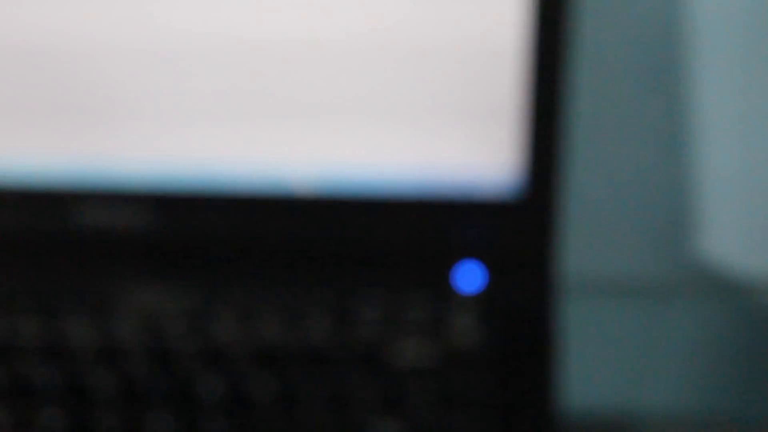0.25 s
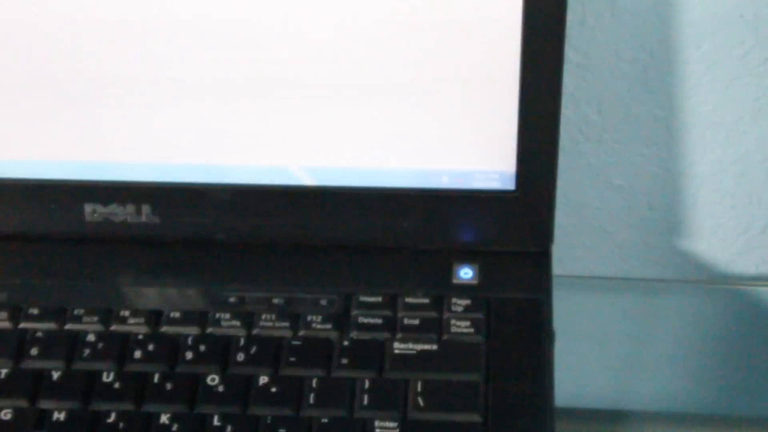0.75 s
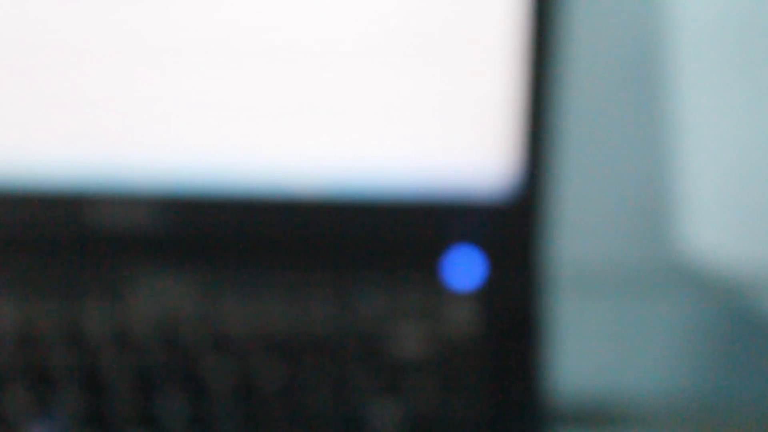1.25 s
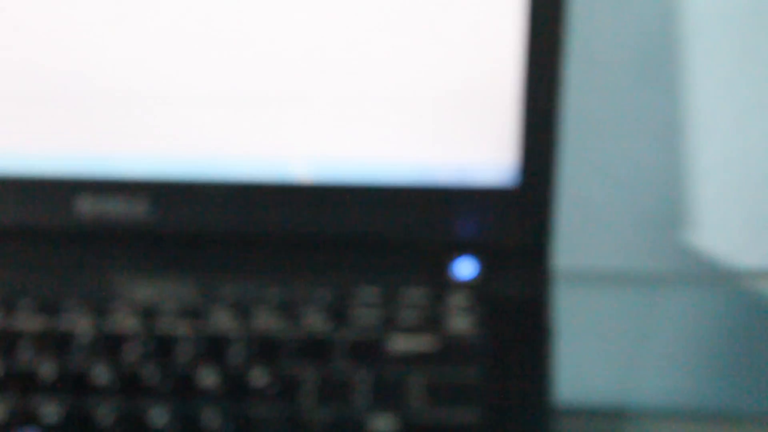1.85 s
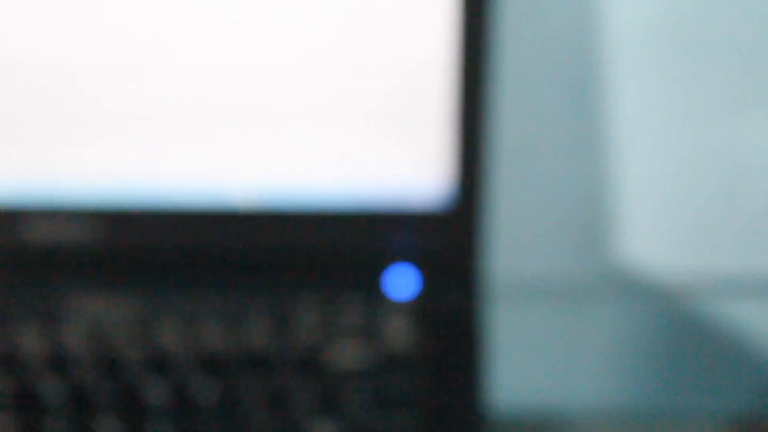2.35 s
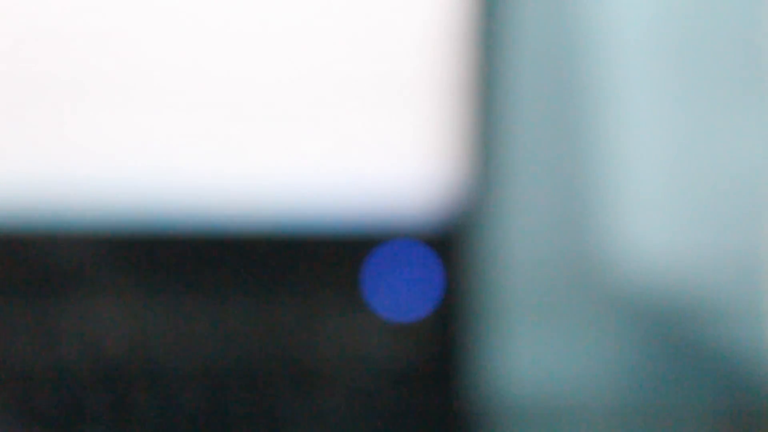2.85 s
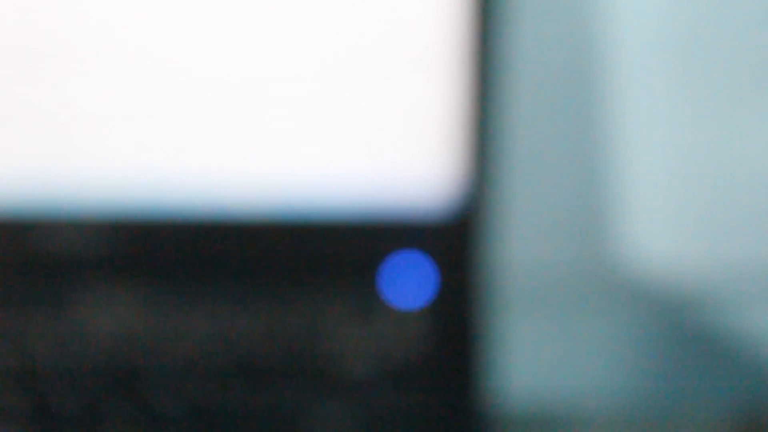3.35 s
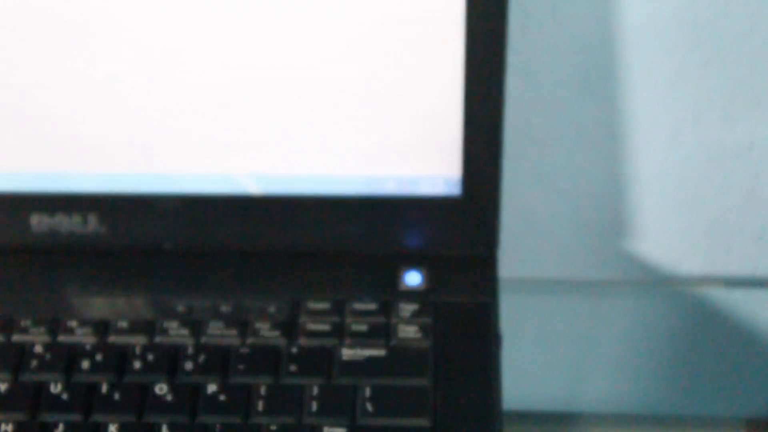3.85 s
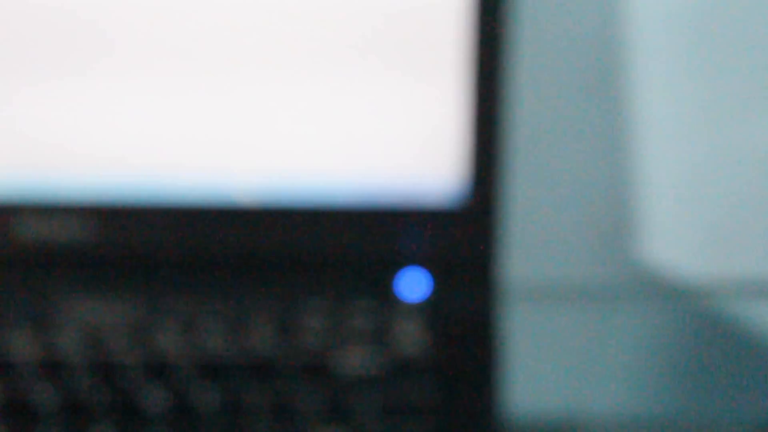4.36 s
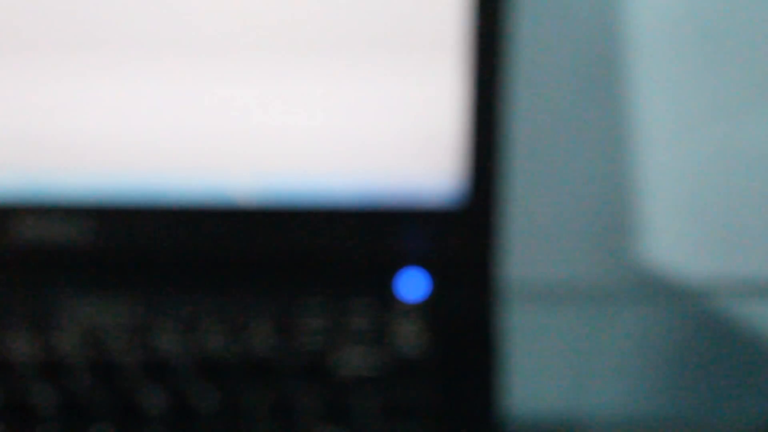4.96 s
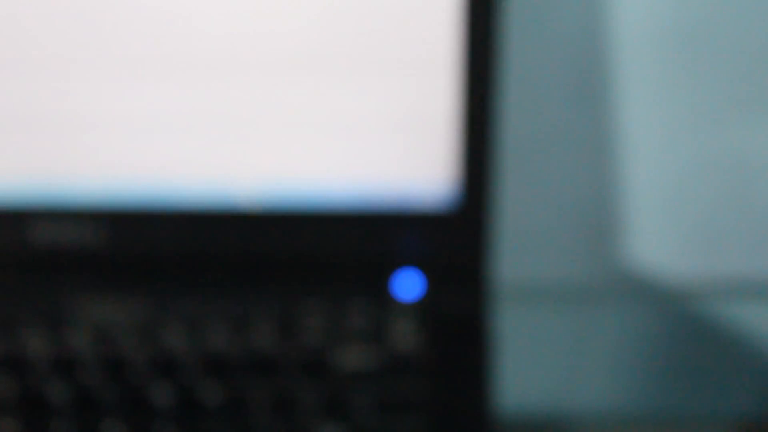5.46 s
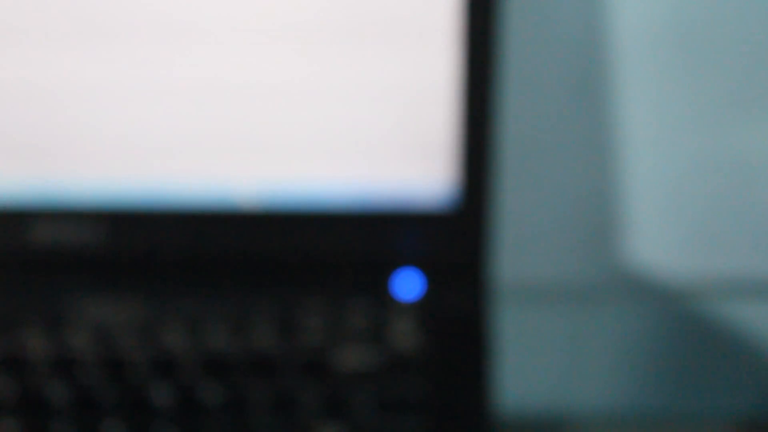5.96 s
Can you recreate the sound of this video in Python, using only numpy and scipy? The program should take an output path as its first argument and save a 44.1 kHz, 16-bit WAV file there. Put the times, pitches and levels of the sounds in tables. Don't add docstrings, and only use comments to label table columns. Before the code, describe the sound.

A low, steady ventilation hum fills a small room throughout, breathing slightly in level. At 0 s a faint hand rustle dies away, with four tiny plastic creaks between 0.25 and 0.6 s. At 0.73 s a little geared lens motor, very close, spins up into a bright whining, gritty whir lasting about 0.4 s. At 1.2 s it runs back, slightly lower and a bit louder, until 1.65 s. From 1.84 to about 3.0 s come nine evenly spaced short buzzes, roughly seven or eight per second, each rising fast and sagging as it coasts; one faint creak at 2.75 s. After a short gap, nine lower, firmer buzzes run from 3.24 to 4.4 s. Quiet hum follows, with a small creak at 4.7 s. A short whir sounds at 5.15 to 5.39 s, then hum and dull faint creaks at 5.65 and 6.17 s. The motor is dry, with only a trace of room echo.

```python
import sys
import numpy as np
from scipy import signal
from scipy.fft import rfft, irfft
from scipy.io import wavfile
from scipy.ndimage import uniform_filter1d

SR = 44100
rng = np.random.default_rng(int(sys.argv[2]) if len(sys.argv) > 2 else 0)


def bounce(signal):
    frames = np.transpose(np.atleast_2d(signal))
    limited = np.clip(frames, -1, 1)
    pcm = np.round(limited * 32767).astype(np.int16)
    wavfile.write(sys.argv[1], SR, pcm)


def volts(x):
    e = np.asarray(x, float) / 20
    return 10 ** e


N = 273420
T = np.arange(N) / SR


def unit(x):
    return x / np.sqrt(np.mean(x ** 2))


def walk(rate):
    hold = int(SR / rate)
    steps = np.repeat(rng.standard_normal(N // hold + 1), hold)
    smooth = uniform_filter1d(uniform_filter1d(steps, hold), hold)
    return unit(smooth[:N])


def response(hz, broad, modes, broad_db, notches=()):
    points = np.array(broad)
    broad_gain_db = np.interp(np.log(hz + 1), np.log(points[:, 0]), points[:, 1])
    power = volts(2 * (broad_db + broad_gain_db))
    for centre, width, db in modes:
        power = power + volts(2 * db) / (1 + (2 * (hz - centre) / width) ** 2) ** 1.655
    dips_db = sum(db / (1 + (2 * (hz - centre) / width) ** 2) for centre, width, db in notches)
    return np.sqrt(power) * volts(dips_db)


def colour(x, *shape):
    size = 16384
    gain = response(np.fft.rfftfreq(size, 1 / SR), *shape)
    cepstrum = irfft(np.log(gain))
    cepstrum[1:size // 2] *= 2
    taps = irfft(np.exp(rfft(cepstrum[:size // 2], size)))[:size // 2]
    return signal.fftconvolve(x, taps)[:N]


# frequency in Hz, level in dB per Hz.
HUM_COLOUR = [(260, -47), (450, -4.5), (546, 0), (705, -4.5), (806, 2.5), (882, -0.5), (979, 0.5),
              (1220, -5), (1650, -6), (2510, -19.5), (9070, -28.5), (15100, -33), (16000, -44)]
# frequency in Hz, width in Hz, level in dB.
ROOM_MODES = [(57, 14, 6.5), (75, 24, 4.9), (128.8, 18.4, 11.7), (145, 13, 11.1), (170.8, 17, 14),
              (218.6, 20.7, 12.8), (259.6, 29, 15.2), (301.8, 19.5, 15.1), (355.3, 41.6, 14.8),
              (397, 11, 12.2), (9000, 40, -21)]


def ventilation():
    air = unit(colour(rng.standard_normal(N), HUM_COLOUR, ROOM_MODES, 0.1))
    level_db = -38 + walk(1.766) / 2
    return air * volts(level_db)


# start in seconds, level in dB, settling time in seconds.
HAND_MOVES = [
    (0, -48, .11),
    (.3, -62, .25),
]


def hand_rustle():
    band = signal.butter(2, [1200, 2500], "band", fs=SR, output="sos")
    rub = unit(signal.sosfilt(band, rng.standard_normal(N)))
    moving = np.full(N, volts(-66))
    for start, db, settle in HAND_MOVES:
        moving += volts(db) * (T >= start) * np.exp(-abs(T - start) / settle)
    return rub * moving * volts(2.0 * walk(12))


# start in seconds, level in dB, first ring in Hz, second ring in Hz, level
# of the second ring against the first in dB.
CREAKS = [
    (0.26, -50, 3000, 1550, 14),
    (.3188, -47, 6300, 11000, 0),
    (.451, -48, 3200, 4300, -3),
    (.5767, -49.5, 6300, 11000, 3),
    (2.752, -47, 4000, 7900, -1),
    (4.683, -49, 4000, 7900, -1),
    (5.65, -49, 4200, 3000, -6),
    (6.172, -50, 4200, 3000, -1),
]


def body_creaks():
    t = np.arange(900) / SR
    out = np.zeros(N + len(t))
    for start, db, low_hz, high_hz, high_db in CREAKS:
        rings = np.sin(2 * np.pi * low_hz * t) + volts(high_db) * np.sin(2 * np.pi * high_hz * t)
        tick = 0.8 * rng.standard_normal(len(t)) * np.exp(-t / 0.0012)
        out[int(start * SR):][:len(t)] += volts(db) * (rings * np.exp(-t / 0.003) + tick)
    return out[:N]


def train(second, head_start, db, first_jolt_db, jolt_db):
    nudges, every_s = 9, 0.1335
    beats = second + every_s * np.arange(-1, nudges - 1)
    first = (beats[0] - head_start, 0.045, 0.07, db - 1.1, first_jolt_db)
    middle = [(start, 0.0365, 0.07, db, jolt_db) for start in beats[1:-1]]
    last = (beats[-1], 0.024, 0.06, db + 0.6, jolt_db + 1.5)
    return [first] + middle + [last]


def motion(moves, spin_up_s, nudge_db):
    brake_s, coast_s = 0.004, 0.03
    speed, loud, load, contact, jolt = np.zeros((5, N))
    for start, on, coast, db, jolt_db in moves:
        span = slice(int(start * SR), int((start + on + coast) * SR))
        t = T[span] - T[span][0]
        off = np.maximum(t - on, 0)
        spin_up = 1 - np.exp(-np.minimum(t, on) / spin_up_s)
        speed[span] = spin_up * np.clip(1 - off / coast, 0, 1) ** 0.9
        load[span] = 0.25 + 0.74 * np.exp(-off / 0.024)
        if on > 0.1:
            contact[span] = np.exp(-off / brake_s)
        else:
            contact[span] = volts(nudge_db) * np.exp(-off / coast_s)
        loud[span] = volts(db)
        jolt[span] = volts(jolt_db) * np.exp(-t / 0.023)
    return speed, loud, load, contact, jolt


PINION, WHEEL = 12, 13


def whine(teeth, hz, full_hz, levels, path):
    orders = np.r_[np.arange(1, 8), np.arange(8, 22) / WHEEL]
    on = hz > 0
    speed = hz[on] / full_hz
    pinion = 2 * np.pi * teeth[on] / PINION
    throb = volts(2.16 * np.cos(pinion) + 1.25 * np.cos(2 * pinion + 1))
    shake_db = 1.5 + 8 * (1 - speed)
    path_hz, path_db = np.transpose(path)
    tone = np.zeros(N)
    for k, (order, db) in enumerate(zip(orders, np.concatenate(levels))):
        swell = speed ** 3
        if k in (1, 2):
            full_db = np.interp(order * full_hz, path_hz, path_db)
            swell = volts(np.interp(order * hz[on], path_hz, path_db) - full_db)
        level = volts(db - shake_db * abs(walk(70)[on]))
        if k < len(levels[0]):
            level = level * throb ** min(order - 1.2, 1.5)
        partial = np.cos(2 * np.pi * (order * teeth[on] + rng.random()))
        tone[on] += np.sqrt(2) * level * swell * partial
    return tone


def turn_pattern(turns, count):
    return unit(rng.standard_normal(count))[(turns % 1 * count).astype(int)]


def clatter(turns):
    flaws = rng.standard_normal(192)
    return np.interp(turns % 1, np.linspace(0, 1, len(flaws)), flaws)


def gear_knocks(teeth):
    wheel, pinion = teeth / WHEEL, teeth / PINION
    uneven_db = 0.5 * turn_pattern(wheel, count=WHEEL) + 1.4 * turn_pattern(pinion, count=PINION)
    knocks_db = 2.1 * np.minimum(rng.standard_exponential(N), 5)
    grains = unit(rng.standard_normal(N) * volts(uneven_db + knocks_db + 1.35 * walk(150)))
    return grains + 0.42 * clatter(wheel) + 0.35 * clatter(pinion)


def rattle(grains, speed, loud, load, jolt, shape, low_db, low_law, high_db):
    scale = np.std(colour(grains, *shape))
    low_drive = loud * load ** 0.73 * speed ** low_law + jolt
    high_drive = loud * load * speed ** 1.76 + 2.2 * jolt
    lows = colour(grains * low_drive, *shape) / scale
    highs = colour(grains * high_drive, *shape) / scale
    split = signal.butter(2, 4000, fs=SR, output="sos")
    rumble = signal.sosfiltfilt(split, lows)
    hiss = highs - signal.sosfiltfilt(split, highs)
    return volts(low_db) * rumble + volts(high_db) * hiss


# frequency in Hz, width in Hz, depth in dB.
NOTCHES = [(1712, 135, -6.5), (2590, 220, -2.5), (3314, 127, -4.5), (4000, 320, -2.5), (5150, 230, -4.5),
           (6360, 560, -5.5), (7620, 520, -6.5), (9200, 550, -3.5), (11040, 200, -1), (13800, 200, -5)]
# frequency in Hz, width in Hz, level in dB.
RIDGES = [(4640, 430, -16.5), (14370, 830, -25)]


def motor(moves, mesh, levels, body, broad, path, spin_up_s, nudge_db, low_db, low_law, high_db):
    speed, loud, load, contact, jolt = motion(moves, spin_up_s, nudge_db)
    full_hz = np.interp(T, *np.transpose(mesh))
    hz = full_hz * speed * (1 + 0.0028 * walk(60))
    teeth = np.cumsum(hz) / SR
    tone = whine(teeth, hz, mesh[0][1], levels, path) * contact
    shape = (broad, body + RIDGES, -6, NOTCHES)
    return tone + rattle(gear_knocks(teeth), speed, loud, load, jolt, shape, low_db, low_law, high_db)


# start in seconds, power on in seconds, coasting in seconds, level in dB,
# jolt of the gear slack in dB.
OUT_RUNS = [
    (.7335, .357, .058, -22.7, -38.5),
    (5.153, .204, 0.03, -22.7, -39.5),
]
# second nudge in seconds, head start of the first in seconds, level in dB,
# first jolt in dB, later jolts in dB.
OUT_TRAIN = (1.9768, .001, -20.8, -37, -48)
# time in seconds, rate in Hz.
OUT_MESH = [(.7, 1174), (1.0, 1179), (1.1, 1179), (5.1, 1184), (5.4, 1180)]
OUT_WHINE = [-37.5, -20.5, -26.5, -44, -36.5, -46, -34.5], [-46, -52, -44, -50, -42.5, -63, -35, -43, -39,
             -33, -37.5, -50, -41, -35.5]
# frequency in Hz, width in Hz, level in dB.
OUT_BODY = [(1634, 145, -3.5), (1920, 25, -19.5), (2057, 102, -5), (2690, 34, -13.5), (2840, 43, -41.5),
            (3180, 34, -2), (3500, 130, -9), (4550, 85, -14.5), (5570, 140, -14.5), (6900, 58, -21),
            (8160, 154, -16.5), (9330, 62, -19), (10360, 120, -16), (11000, 81, -16.5), (11880, 150, -16),
            (12900, 520, -15.5)]
# frequency in Hz, level in dB per Hz.
OUT_BROAD = [(240, -47), (400, -13), (684, -23), (848, -11), (1570, -2), (1740, -6), (2130, 1.5),
             (2520, -9.5), (3470, -1), (5170, -12), (8190, -11.5), (9410, -19), (12800, -17), (15600, -25)]
# frequency in Hz, gain in dB.
OUT_PATH = [(900, -30), (1800, -16), (1930, -7), (2085, 5), (2250, 2), (2360, 0), (2700, -16), (2950, -9),
            (3140, 6), (3300, 2), (3540, 0)]


def lens_out():
    return motor(OUT_RUNS + train(*OUT_TRAIN), OUT_MESH, OUT_WHINE, OUT_BODY, OUT_BROAD, OUT_PATH,
                 spin_up_s=0.0236, nudge_db=-2, low_db=-1.13, low_law=0.92, high_db=4.2)


# start in seconds, power on in seconds, coasting in seconds, level in dB,
# jolt of the gear slack in dB.
BACK_RUNS = [
    (1.2066, 0.38, .058, -21.2, -35.5),
]
# second nudge in seconds, head start of the first in seconds, level in dB,
# first jolt in dB, later jolts in dB.
BACK_TRAIN = (3.3797, .003, -20.3, -37, -50)
# time in seconds, rate in Hz.
BACK_MESH = [(1.2, 1109), (1.36, 1112), (1.43, 1095), (1.49, 1085), (1.539, 1106), (1.58, 1115),
             (3.201, 1108)]
BACK_WHINE = [-37.5, -22, -40.5, -43, -43, -54, -44], [-45.5, -63, -44.5, -64, -50, -60, -46, -33.5, -35.5,
              -47, -32.5, -34.5, -56, -37]
# frequency in Hz, width in Hz, level in dB.
BACK_BODY = [(1603, 60, -6), (2075, 200, -6), (2866, 78, -10.5), (3130, 98, -11.5), (3320, 270, -12),
             (4530, 75, -16.5), (4900, 330, -17), (5230, 120, -15), (7100, 230, -22), (8280, 710, -20.5),
             (10320, 130, -21.5), (10800, 40, -20), (11340, 130, -22.5), (11820, 190, -17.5),
             (12820, 640, -15.5)]
# frequency in Hz, level in dB per Hz.
BACK_BROAD = [(240, -45), (400, -18.5), (432, -13), (473, -23), (988, -19), (1190, -3), (1590, 0),
              (1800, -7.5), (2060, -6.5), (2600, -10), (4940, -12), (7590, -22.5), (12800, -21.5),
              (15600, -28)]
# frequency in Hz, gain in dB.
BACK_PATH = [(900, -22), (1120, -5), (1300, -1), (1560, 2), (1720, -1), (1880, -12), (2000, -3), (2100, 2),
             (2230, -1), (2600, -8)]


def lens_back():
    return motor(BACK_RUNS + train(*BACK_TRAIN), BACK_MESH, BACK_WHINE, BACK_BODY, BACK_BROAD, BACK_PATH,
                 spin_up_s=0.0208, nudge_db=1.5, low_db=-3, low_law=0.68, high_db=5.2)


def room_tail(sound):
    t = np.arange(SR // 2) / SR
    tail = rng.standard_normal(len(t)) * np.exp(-np.log(1000) * t / 0.34)
    return signal.fftconvolve(sound, tail / np.sqrt(np.sum(tail ** 2)))[:N]


def scene():
    background = ventilation() + hand_rustle() + body_creaks()
    lens = lens_out() + lens_back()
    return (background + lens + volts(-26.5) * room_tail(lens))[None]


def band_limit(x):
    return signal.sosfilt(signal.butter(12, 16470, fs=SR, output="sos"), x)


def record(dry):
    top_cut = signal.ellip(16, 0.3, 90, 15750, fs=SR, output="sos")
    mix = signal.sosfilt(top_cut, dry)
    return band_limit(mix)


dry = scene()
out = record(dry)
bounce(out)
```